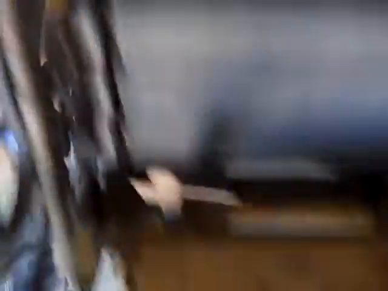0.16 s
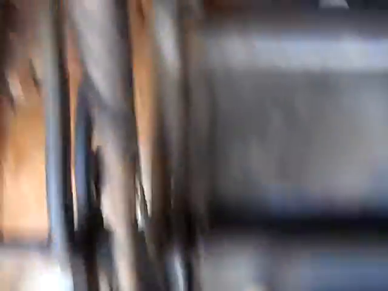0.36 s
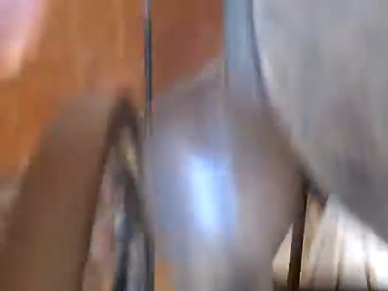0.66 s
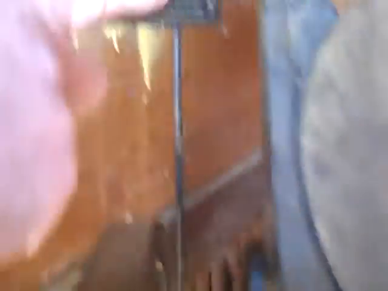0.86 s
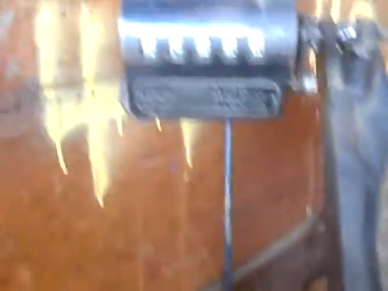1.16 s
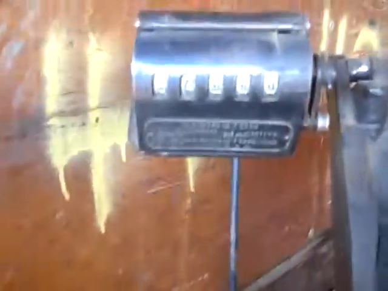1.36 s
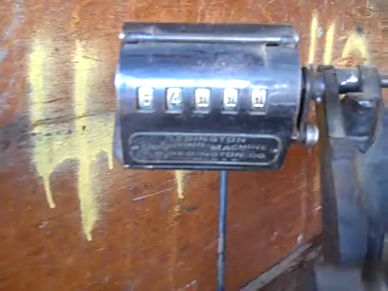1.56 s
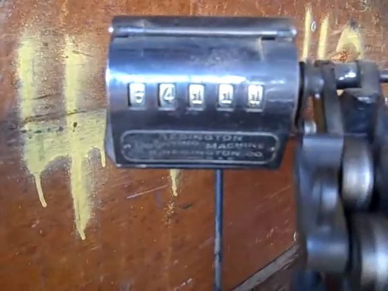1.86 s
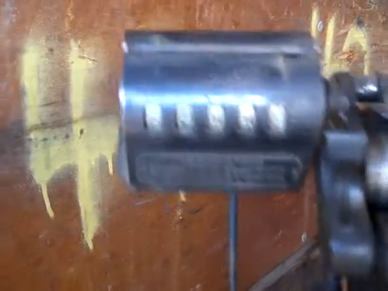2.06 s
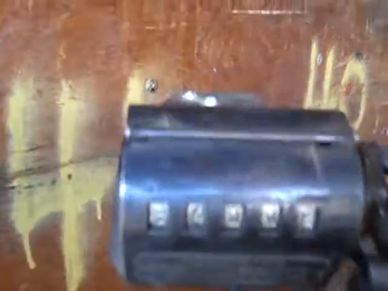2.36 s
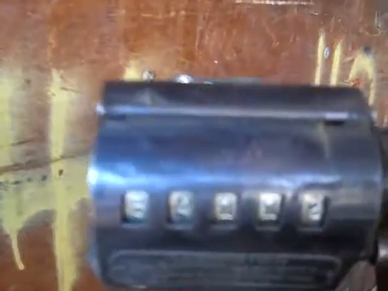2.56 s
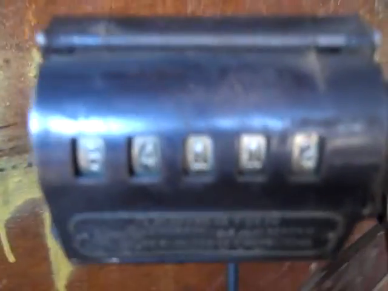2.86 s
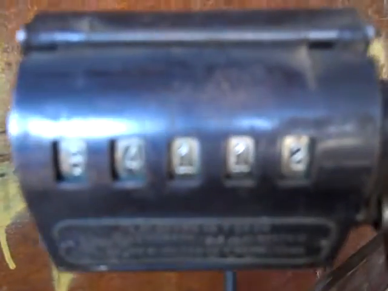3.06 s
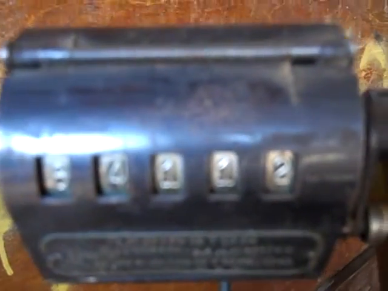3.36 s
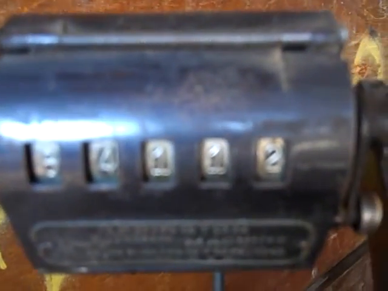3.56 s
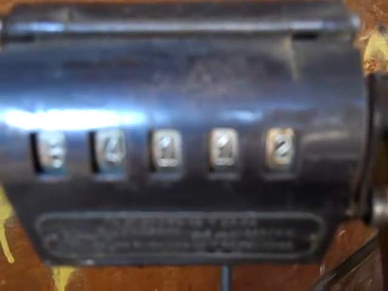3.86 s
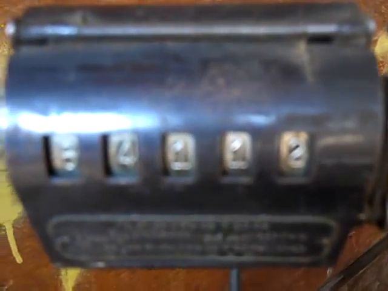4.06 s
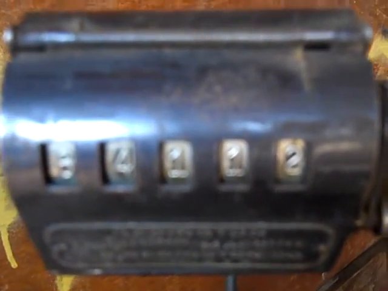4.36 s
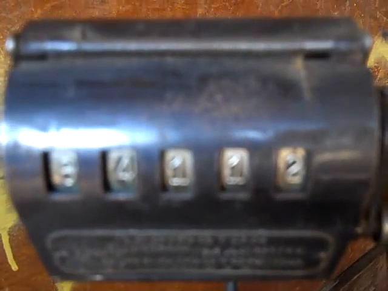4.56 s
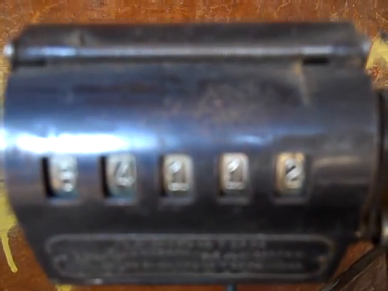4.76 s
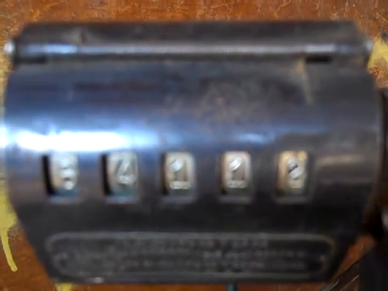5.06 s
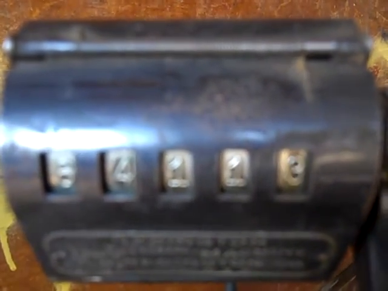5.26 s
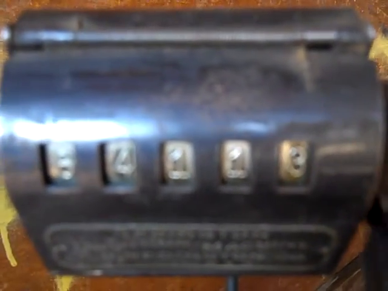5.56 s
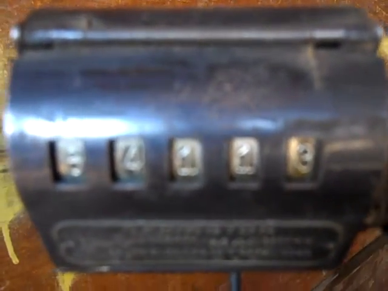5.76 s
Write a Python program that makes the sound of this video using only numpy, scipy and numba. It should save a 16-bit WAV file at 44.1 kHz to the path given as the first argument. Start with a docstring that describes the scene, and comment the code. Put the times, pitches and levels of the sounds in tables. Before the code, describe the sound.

An old platen press runs close to a phone microphone in a small, dry workshop. From 0 to 0.5 s bright, hard latch clicks patter quickly over rumble and hiss. A steel clank lands at 0.8 s, deep iron thuds at 0.9 s, and a lower, pinging steel blow near 1.15 s. Smaller knocks lead to a heavy rattling double thud around 1.9 s, with sharp clicks at 2.0-2.15 s and 2.55 s. It thins to light ticks until a firm thud at 3.0 s. Clicks then crowd from 3.1 to 3.3 s, ending in the loudest, distorted snap at 3.52 s with a low thump on the left. Steel rings at 3.97 s, thuds follow around 4.1 s, and a clank and click at 4.35 s. Loose knocks build to a heavy rattling thud at 5.05 s, crisp clicks at 5.35 and 5.77 s, with quieter clatter between.

```python
"""Platen printing press

A platen press runs in a workshop, close to a phone with two microphone ports. Pawls and latches click
(shaped noise, ringing modes), a steel part rings when struck (damped sines), the iron frame thuds and
rattles as platen and rollers change direction (resonated knocks); a drive hums underneath (coloured
noise, gear taps) with a broad hiss. Delay lines give the shop's reverberation; the loudest blows
overload the recorder."""
import sys
import numpy as np
from scipy import signal
from scipy.fft import rfft, irfft
from scipy.io import wavfile
from scipy.ndimage import uniform_filter1d
from numba import njit

SR = 44100
rng = np.random.default_rng(int(sys.argv[2]) if len(sys.argv) > 2 else 0)


def put_to_file(sound):
    """Save the sound as 16-bit audio at rate SR, in the file named by the first command-line argument."""
    columns = np.atleast_2d(sound).T  # one column per channel
    safe = np.clip(columns, -1, 1)
    whole_steps = np.round(safe * 32767)
    wavfile.write(sys.argv[1], SR, whole_steps.astype(np.int16))


N = 260190


def undb(db):
    """Amplitude factor of a level in dB."""
    return 10 ** (np.asarray(db) / 20)


def band(x, hz, width_hz):
    """Two-pole resonance, gain 1 at the centre."""
    b, a = signal.iirpeak(hz, hz / width_hz, fs=SR)
    return signal.lfilter(b, a, x)


def decay(length_s, t60_s, rise_s):
    """Envelope with exponential rise and a fall of 60 dB per t60_s."""
    t = np.arange(int(length_s * SR)) / SR
    return (1 - np.exp(-t / rise_s)) * 1000. ** (-t / t60_s)


def peak(x, db):
    """Scale x by its own peak to db."""
    return x * undb(db) / np.abs(x).max()


def pan_gains(db):
    """Left and right gains, db apart; positive is left."""
    return undb([[db / 2], [-db / 2]])


def add(out, start_s, x):
    """Mix x into out from start_s."""
    i = int(start_s * SR)
    out[:, i:i + x.shape[1]] += x[:, :N - i]


def pair(size, alike):
    """Stereo noise whose channels correlate by `alike`."""
    mid, side = rng.standard_normal((2, size))
    return np.sqrt(1 + alike) * mid + np.sqrt(1 - alike) * side * np.array([[1], [-1]])


def coloured(points, alike):
    """Steady stereo noise of rms 1 with the given spectrum."""
    hz, db = np.transpose(points)
    f = np.maximum(np.arange(N // 2 + 1) * SR / N, 1)
    spectrum_db = np.interp(np.log(f), np.log(hz), db, right=-99)
    x = irfft(rfft(pair(N, alike)) * undb(spectrum_db), N)
    return x / x.std()


def slewed(steps, hold, window):
    """Random levels, each held for `hold` samples, then averaged over `window`."""
    return uniform_filter1d(np.repeat(rng.standard_normal(steps), hold), window)


def walk(rate_hz):
    """Random levels held 1 / rate_hz and slewed twice."""
    k = int(SR / rate_hz)
    return uniform_filter1d(slewed(N // k + 1, k, k), k)[:N]


def ring(hz, db, t60_s, chance, size):
    """Damped modes heard at two places; each beats like a close pair, with its own phase and balance."""
    t = np.arange(size) / SR
    beat = 1 + 0.18 * np.cos(2 * np.pi * 0.0051 * hz * t + np.pi * chance[3])
    level = undb(db) * beat * 1000. ** (-t / t60_s) * (1 - np.exp(-t / 0.00067))
    skew_rad, tilt_db = .4 * chance[1] * hz / 4000, 1.5 * chance[2]
    sides = []
    for side in (-1, 1):
        tone = np.sin(2 * np.pi * hz * t + np.pi * chance[0] + side * skew_rad)
        sides.append((level * undb(side * tilt_db) * tone).sum(0))
    return np.array(sides)


# pawl and latch clicks: (time [s], strength [dB], centre [Hz], body re strength [dB],
# afterglow re first hit [dB])
PAWL_CLICKS = [(.0054, -1.5, 3000, -6, -11), (0.0288, 8, 7280, -11.5, -18.5), (0.0956, -3, 6800, -10, -4),
               (0.1111, 8.5, 7600, -14.5, -18), (.174, -8, 2670, -9, -5), (0.251, 3.5, 3640, -17, -14),
               (0.2582, 3.5, 6400, -5, -13), (0.4157, -5.5, 5760, -8, 3), (0.4852, 7.5, 8120, -34, -12),
               (0.5095, -1.5, 7060, -21, -13), (0.7952, -5.5, 6500, 5, -21.5), (1.266, 0, 5200, -11, -4.5),
               (1.305, -10.5, 6660, -30, -22), (1.3086, -6.5, 6350, -8, -11.5),
               (1.3646, -18.5, 3030, -20, -4), (1.4529, -7, 6300, -9, -19.5), (1.568, -26, 2530, -24, -17),
               (1.668, -24, 2800, -16, -20), (1.8515, -11.5, 7100, -13, -12), (1.8582, -19, 3060, 5.5, -31),
               (1.881, -11.5, 5140, -7, 2), (1.9665, -5.5, 3500, -5.5, 8), (2.0184, 0.5, 5500, -10.5, -22),
               (2.0331, -2.5, 6940, -19, -29), (2.1254, -7.5, 6300, -22, -15),
               (2.1392, 6.5, 6050, -16.5, -24), (2.2417, -22, 4770, -32, -29), (2.279, -17, 2780, -14, -16),
               (2.321, -27.5, 5200, -1, -11), (2.4292, -16.5, 2800, -20, -16), (2.5278, -27, 6210, -8, -4),
               (2.5478, 4.5, 6660, -16, -32), (2.5642, -4, 6960, -7, -19), (2.6513, -32.5, 6830, -5.5, -20),
               (2.913, -18, 8030, -13, 0), (3.1029, 5, 6640, -18.5, -15.5), (3.1898, 0, 2820, -17, -15),
               (3.2158, 4.5, 6700, -11.5, -11), (3.2492, -14, 6750, -6, -17), (3.2849, 0.5, 5840, -13, -3),
               (3.3022, 10, 6580, -19, -18), (3.3614, -21, 2660, 0.5, 14), (3.489, -28.5, 5140, 1, -2),
               (3.5225, 18, 5340, -18, -21.5), (3.6073, -18, 5450, -16, -12), (3.68, -6.5, 7700, -10, -2.5),
               (4.3484, 5.5, 6900, -10.5, -25), (4.4837, -31, 7650, -1, -5), (4.5124, -12, 6700, -13, -23),
               (4.5179, -5, 6550, -13, -14), (4.594, -8, 4900, -9, -9), (4.656, -16.5, 4280, -4, -6),
               (4.6639, 3.5, 6720, -22, -19.5), (4.7764, -20.5, 2630, -11, -10),
               (5.098, -12, 5200, -5, -14), (5.107, -6, 6500, -4, -19), (5.2295, 0, 6640, -5.5, -32),
               (5.242, -0.5, 4780, -17, -27.5), (5.283, -14.5, 5040, -5.5, -27),
               (5.338, -1.5, 5150, -23, -15), (5.3507, 12.5, 5830, -16.5, -35),
               (5.4315, -25, 5300, -26, -30), (5.448, -16.5, 4650, -29, -38),
               (5.497, -19.5, 3800, -12, -12), (5.546, -24.5, 4720, -0.5, -28),
               (5.5678, -25, 5910, 0.5, -29), (5.647, -18.5, 3000, -19, -6), (5.7253, -21.5, 5760, -12, 12),
               (5.7692, 9, 6920, -15.5, -35), (5.785, -7.5, 7600, -2, -22.5)]
# latch modes: (level [dB], t60 [s]); their pitches: [Hz]
LATCH_MODES = [(-8.5, 0.14), (-5, 0.032), (-14.5, 0.11), (-19, 0.027), (-39, 0.022), (-21, 0.06),
               (-41, 0.023), (-25.5, 0.02)]
LATCH_MODE_HZ = [3779, 4737, 5179, 5884, 6315, 7714, 8091, 8624]
CLICK_T60_AT_0DB_S, LOG_T60_PER_DB = 0.015, -0.0025  # harder clicks die slightly sooner
CLICK_PAN_DB, PAN_SCATTER_DB = 0.3, 2.5
LATCH_DB, LATCH_PER_GLOW = -22, 0.57  # the latch rings more where the afterglow is strong
AIR_DB, AIR_PER_DB, AIR_T60_S = -34, 0.9, 0.099  # harder clicks have more shimmer in the highest treble
SCRAPE_S = .004


def click_shape(db, glow_db):
    """Envelope of scrape, hit, one bounce and an afterglow in a patter of tiny ticks."""
    hit = decay(.3, CLICK_T60_AT_0DB_S * np.exp(LOG_T60_PER_DB * db), 0.0001)
    gap, loss = rng.random(2)
    bounce = undb(-7 - 12 * loss) * np.roll(hit, int((.004 + .002 * gap) * SR))
    glow = bounce + undb(glow_db) * decay(.3, 0.17, 0.00014)
    patter = undb(4 * slewed(250, 60, 40)[:len(hit)])
    scrape = undb(-22) * np.linspace(0, 1, int(SCRAPE_S * SR))
    return np.r_[scrape, hit + glow * patter]


def clicks():
    """A scrape, a hard tick with one bounce, a short knock below, an afterglow, and the latch that rings on."""
    out, lead = np.zeros((2, N)), int(SCRAPE_S * SR)
    latch_hz = np.array(LATCH_MODE_HZ)[:, None]
    modes_db, modes_t60_s = (c[:, None] for c in np.transpose(LATCH_MODES))
    for s, db, hz, body_db, glow_db in PAWL_CLICKS:
        ring_db, air_db = LATCH_DB + LATCH_PER_GLOW * glow_db, AIR_DB + AIR_PER_DB * db
        pan = pan_gains(CLICK_PAN_DB + PAN_SCATTER_DB * rng.standard_normal())
        shape = click_shape(db, glow_db)
        noise = pair(len(shape), 0.09) * shape

        tick = band(band(noise, hz, 1.4 * hz), hz, 1.4 * hz)
        tick = tick + undb(4.5) * band(noise, hz, 0.032 * hz)  # the struck pawl's own short note

        shimmer = pair(len(shape), 0.26) * np.r_[np.zeros(lead), decay(.3, AIR_T60_S, .001)]
        air = band(band(noise + undb(-12) * shimmer, 11900, 4000), 11700, 4000)

        body = band(band(pair(len(shape), 0.87) * shape, 1400, 4700), 1550, 5000)

        chance = rng.standard_normal((5, len(LATCH_MODES), 1))
        latch_db = db + ring_db + modes_db + 0.83 * chance[4]
        latch = ring(latch_hz, latch_db, modes_t60_s, chance, size=SR // 4)

        # tick starts lower than heard: the port cavities lift its band
        click = peak(tick, db - 7.5) + peak(body, db + body_db) + peak(air, db + air_db)
        add(out, s - lead / SR, click * pan)
        add(out, s, latch * pan)
    return out


# blows on the steel part: (time [s], level [dB], landing [0 middle - 1 edge], brightness [dB/octave])
STEEL_BLOWS = [(0.2525, -21.5, 0.71, 2.5), (0.3105, -32.5, 0.48, 7), (.794, -19, 1, 0.5),
               (1.0895, -47, .1, -6), (1.1646, -11, 0.0055, 1), (3.5223, -31.5, 0.99, 6),
               (3.6049, -38, .6, 7), (3.8757, -38, 0.42, 1.5), (3.9656, -11.5, 0.42, 2.5),
               (4.2858, -38.5, 0.17, -1), (4.3476, -17, 0.37, 6), (4.566, -35.5, 0.47, -10),
               (5.107, -35, 0.68, 4)]
# steel modes: (share [dB], t60 [s]); their pitches: [Hz]
STEEL_MODES = [(3, 0.28), (5, 0.12), (14, 0.085), (4, 0.3), (-2, 0.18), (-3, 0.066), (2.5, 0.14),
               (-7.5, 0.09), (-8, 0.2), (-8.5, 0.048), (-29.5, 0.037), (5, 0.073), (-21, 0.11), (-20, .15),
               (-26, 0.094), (-24, 0.071), (-28, .1)]
STEEL_MODE_HZ = [1864, 2336, 2919, 2999, 3714, 4386, 4613, 5170, 5558, 5905, 6158, 6604, 7100, 7720, 8926,
                 10600, 11560]
# pitches where a blow's spectrum is set: [Hz]
BLOW_POINTS_HZ = [1864, 2336, 2960, 3714, 4500, 5560, 6604]
# blow at the six higher points, re the lowest, landing in the middle and at the edge: [dB]
MIDDLE_BLOW_DB = [-17, -31.5, -11.5, -19, -20, -27]
EDGE_BLOW_DB = [4, -8, -7.5, -4.5, 2, 5.5]
STEEL_PAN_DB = -4


def steel():
    """Each blow starts all modes, in shares that depend on where it lands, with a crack at the contact."""
    out, hz = np.zeros((2, N)), np.array(STEEL_MODE_HZ)[:, None]
    share_db, t60_s = (c[:, None] for c in np.transpose(STEEL_MODES))
    for s, db, edge, bright_db in STEEL_BLOWS:
        blow_db = (1 - edge) * np.array(MIDDLE_BLOW_DB) + edge * np.array(EDGE_BLOW_DB)
        landing_db = np.interp(hz, BLOW_POINTS_HZ, [0, *blow_db])
        size_db = db + share_db + landing_db + bright_db * np.log2(hz / hz[0])
        tone = ring(hz, size_db, t60_s, rng.standard_normal((4, len(STEEL_MODES), 1)), size=SR // 2)
        crack = band(pair(SR // 2, 0.47) * decay(.5, 0.063, 0.00048), 1300, 3300)
        # the many weak modes between the strong ones
        clang = band(pair(SR // 2, 0.3) * decay(.5, 0.073, 0.0005), 5500, 6000)
        blow = tone + peak(crack, size_db.max() - 7) + peak(clang, size_db[3:].max() - 10)
        add(out, s, blow * pan_gains(STEEL_PAN_DB))
    return out


# thuds of the frame: (time [s], peak [dB], rattle re thud [dB], t60 of the shaking [s],
# rattle brightness [dB/octave])
FRAME_THUDS = [(0.171, -30.5, 12, 0.13, 4.5), (.26, -23.5, 10, 0.32, -20), (.47, -15.5, -3.5, 0.2, 1.5),
               (.499, -19, 0.5, 0.15, 0), (0.669, -19, -7, 0.17, -19), (.882, -10, -8, 0.35, 4.5),
               (0.948, -7, -8, 0.23, 2), (1.163, -14.5, -8.5, 0.27, -7), (1.331, -18, -9, 0.19, 1),
               (1.451, -23.5, -0.5, .16, 6), (1.588, -16.5, -10, 0.16, -17), (1.629, -25.5, -9, 0.42, -8),
               (1.674, -21, -5.5, 0.18, -7), (1.862, -7.5, 3, 0.065, -21), (1.89, -9, -6.5, 0.23, 3),
               (1.97, -13.5, -3.5, 0.26, 1), (2.09, -23.5, -15, 0.13, -9), (2.172, -27.5, -10, 0.12, 1),
               (2.24, -24, -32, 0.11, 0), (2.373, -17.5, -9, 0.1, -14), (2.828, -36, -20, 0.32, -4),
               (2.913, -28.5, 2, 0.1, -2), (3.016, -8.5, -5, 0.2, 7), (3.094, -16.5, -2, 0.24, -4),
               (3.867, -17, -9.5, 0.34, -3), (4.038, -11.5, -3.5, 0.29, 2), (4.111, -12, -8, .2, -28),
               (4.19, -21, -7, 0.16, -15), (4.548, -22.5, -2.5, 0.29, -6), (4.659, -22, 1.5, 0.27, 1),
               (4.794, -19, -18, 0.12, -12), (4.829, -23.5, -14, 0.31, 2), (4.877, -21, -6, 0.17, 1),
               (4.905, -23.5, -2.5, 0.074, -32), (4.918, -34, 3, 0.09, -26), (5.046, -6, -9.5, 0.33, 6),
               (5.066, -14, 10.5, 0.13, -14), (5.108, -19, 9.5, 0.053, -32), (5.126, -12.5, -15, 0.22, -18),
               (5.199, -29.5, 3, 0.075, -22), (5.23, -23.5, -27, 0.17, -2), (5.306, -21, -15, 0.15, 7),
               (5.459, -24.5, -33, .25, 0), (5.593, -20, -5, 0.17, -14), (5.817, -27, -23, 0.06, -3)]
# iron frame modes, also tapped by the gears: (centre [Hz], width in a thud [Hz], level before tilt [dB])
FRAME_MODES = [(129.6, 32, -11.5), (267.4, 64, 2), (310.2, 8.4, 5), (412.5, 47, 2.5), (450.3, 32, 5),
               (553, 75, 4.5), (664, 34, 5), (840, 290, 2.5), (1036, 36, 9), (1580, 160, -1)]
# loose parts that answer the shaking: (centre [Hz], width [Hz], level before tilt [dB])
LOOSE_PARTS = [(1892, 187, 7.5), (2298, 590, 8.5), (2603, 59, 3.5), (2890, 480, 1.5), (3788, 103, 8),
               (4360, 200, -1), (5070, 400, -6), (6250, 820, -10.5), (7270, 27, -1), (7930, 260, -15)]
THUD_DB_PER_OCT, THUD_TILT_PER_DB = 1, 0.62  # harder thuds are brighter


def frame():
    """Heavy parts meet and shake for a while: uneven knocks ring the frame and the loose parts on it."""
    out = np.zeros((2, N))
    for s, db, rattle_db, t60_s, sharp_db in FRAME_THUDS:
        bright_db = THUD_DB_PER_OCT + THUD_TILT_PER_DB * db
        shape = decay(.45, t60_s, 0.0014)
        # the shaking comes in clusters a few milliseconds long
        knocks = shape * undb(3.8 * slewed(200, 100, 100)[:len(shape)])
        low, high = pair(len(shape), 0.99) * knocks, pair(len(shape), 0.3) * knocks
        thud = sum(undb(g + bright_db * np.log2(f / 450)) * band(low, f, w)
                   for f, w, g in FRAME_MODES)
        thud = band(band(thud, 440, 2130), 440, 2130)
        rattle = sum(undb(g + sharp_db * np.log2(f / 2500)) * band(band(high, f, 4 * w), f, w)
                     for f, w, g in LOOSE_PARTS)
        add(out, s - .002, peak(thud, db) + peak(rattle, db + rattle_db))
    return out


# levels of the rumble and of the broad hiss, which also swells with some of the blows:
# (time [s], rumble [dB], hiss [dB])
RUMBLE_HISS_LEVELS = [(0, -36, -35), (.45, -44, -50.5), (1.03, -45, -44.5), (1.4, -41.5, -46.5),
                      (1.9, -50, -51), (2.1, -44.5, -47.5), (2.8, -50.5, -53.5), (3, -49.5, -49),
                      (3.19, -31, -41.5), (3.4, -43.5, -46), (3.53, -37, -36.5), (3.75, -45.5, -52),
                      (4.06, -39.5, -49), (4.5, -47, -47), (4.75, -40.5, -48), (5.299, -51.5, -50),
                      (5.9, -45, -53.5)]
# spectra, relative: (frequency [Hz], density [dB per Hz])
RUMBLE_SPECTRUM = [(15, -52), (25, -17), (102, 4), (186, 1.5), (253, 4), (368, -1), (444, -1), (743, -3),
                   (994, -12.5), (1500, -53), (1950, -19), (3300, -120)]
HISS_SPECTRUM = [(410, -1.5), (700, -4.5), (1050, 8), (1350, 0.5), (2860, -2.5), (4930, -9.5), (7890, -12),
                 (9540, -9.5), (11700, -3), (14500, -14)]
MEAN_TAPS_PER_S = 45
TEETH_DB, TEETH_SPREAD_DB = -6, 6.5  # slack in the gears, against the rumble


def gear_teeth():
    """Slack teeth tap the frame at random times and strengths; each mode's level wanders."""
    taps = (rng.random(N) < MEAN_TAPS_PER_S / SR)
    taps = taps * undb(TEETH_SPREAD_DB * rng.standard_normal(N).clip(-2, 2))
    # greased contact: a push near 1 ms
    taps = uniform_filter1d(uniform_filter1d(taps, size=20), size=20)
    teeth = sum(undb(g + 4.9 * walk(3.03)) * band(taps, f, 0.53 * w) for f, w, g in FRAME_MODES)
    return teeth / teeth.std()


def rumble_and_hiss():
    """Motor and flywheel rumble with gear taps, and a broad hiss; rumble and hiss flicker."""
    s, rumble_db, hiss_db = np.transpose(RUMBLE_HISS_LEVELS)
    t = np.arange(N) / SR
    rumble = coloured(RUMBLE_SPECTRUM, 0.98) * undb(2 * walk(8.1)) + undb(TEETH_DB) * gear_teeth()
    hiss = coloured(HISS_SPECTRUM, .6) * undb(np.interp(t, s, hiss_db) + 3 * walk(14))
    return rumble * undb(np.interp(t, s, rumble_db)) + hiss


@njit
def walls(x, lags, gain, damp):
    """Eight delay lines that feed each other, duller on every round."""
    line, soft, out = np.zeros((8, 4096)), np.zeros(8), np.zeros((2, len(x)))
    for i in range(len(x)):
        total = 0.
        for k in range(8):
            soft[k] += (1 - damp) * (gain[k] * line[k, (i - lags[k]) & 4095] - soft[k])
            total += soft[k]
            out[k % 2, i] += soft[k]
        for k in range(8):
            line[k, i & 4095] = x[i] + soft[k] - total / 4
    return out


SHOP_T60_S, SHOP_DAMP, SHOP_DB = 0.15, 0.49, -31  # t60 before damping


def shop(press):
    """Workshop reverberation of the press, from random wall delays."""
    lags = rng.integers(300, 1800, 8)
    gain = undb(-60 * lags / SR / SHOP_T60_S)
    # the tiny offset avoids denormals
    return undb(SHOP_DB) * walls(press.mean(0) + 1e-18, lags, gain, SHOP_DAMP)


# low thumps on the left as the overloaded recorder clips unevenly: (time [s], peak [dB], length [s])
LOW_THUMPS = [(0.102, -41, 0.0046), (0.785, -40, 0.012), (3.522, -5.5, 0.0087), (3.53, -14, 0.0061),
              (5.343, -45, 0.006)]


def low_thumps():
    """One short low thump on the left for each listed overload: a smooth negative pulse."""
    out = np.zeros((2, N))
    for s, db, length_s in LOW_THUMPS:
        add(out, s, -undb(db) * np.hanning(int(length_s * SR)) * np.array([[1], [0]]))
    return out


def port(x, hz, width_hz, upper_db, gain_db):
    """The cavity behind a port peaks at its resonance and falls above; a higher resonance follows in step."""
    w = 2 * np.pi * hz
    warped_fs = np.pi * hz / np.tan(np.pi * hz / SR)  # keeps the peak at hz
    b, a = signal.bilinear([w * w], [1, 2 * np.pi * width_hz, w * w], warped_fs)
    cavity = signal.lfilter(b, a, x)
    return undb(gain_db) * (cavity - undb(upper_db) * band(x, 13400, 2600))


def scene():
    """Press, its reverberation in the shop, and the rumble and hiss."""
    press = clicks() + steel() + frame()
    return press + shop(press) + rumble_and_hiss()


# microphone ports, left and right: (cavity resonance [Hz], width [Hz], upper resonance [dB], gain [dB])
MIC_PORTS = [(8000, 1700, -9, -1), (6050, 1700, -12, 0)]
LEFT_LAG_S, TOP_HZ = 4e-5, 14300


def record(dry):
    """The left port hears a little late; the converter clips and cuts the top."""
    late = np.interp(np.arange(N) - LEFT_LAG_S * SR, np.arange(N), dry[0])
    ports = np.array([port(x, *p) for x, p in zip((late, dry[1]), MIC_PORTS)]) + low_thumps()
    lowpass = signal.ellip(6, .2, 30, TOP_HZ, fs=SR, output="sos")
    return signal.sosfilt(lowpass, np.clip(ports, -1, 1))


dry = scene()
out = record(dry)
put_to_file(out)
```